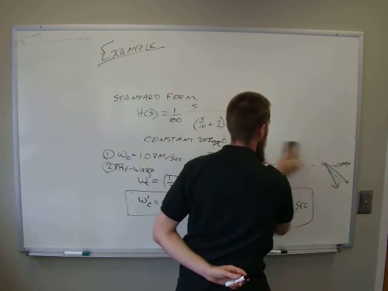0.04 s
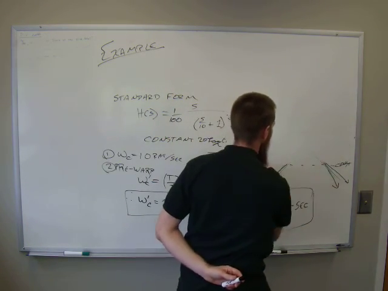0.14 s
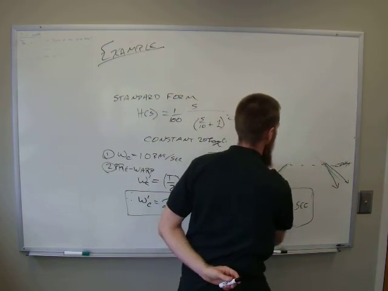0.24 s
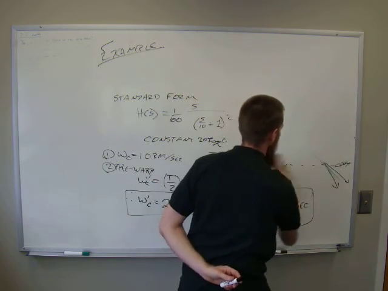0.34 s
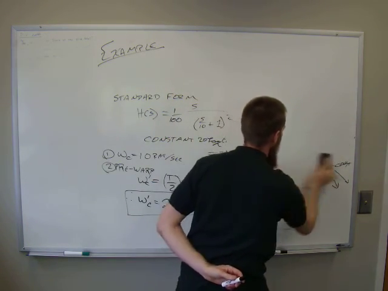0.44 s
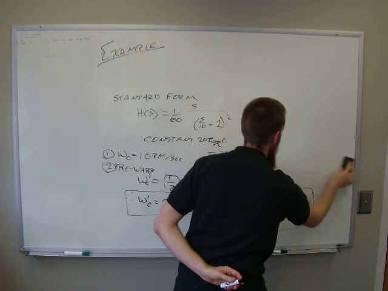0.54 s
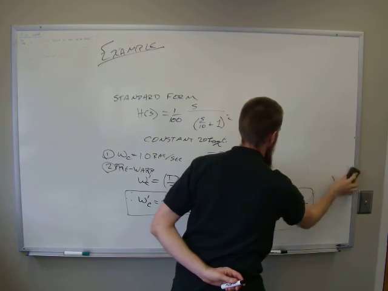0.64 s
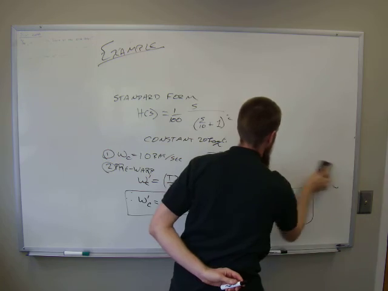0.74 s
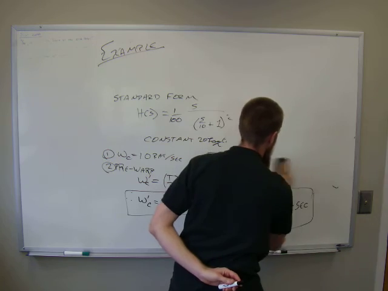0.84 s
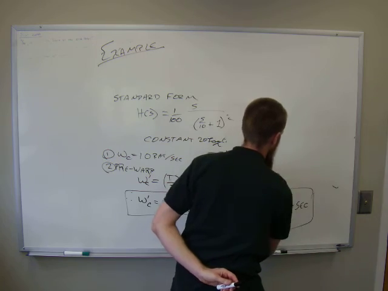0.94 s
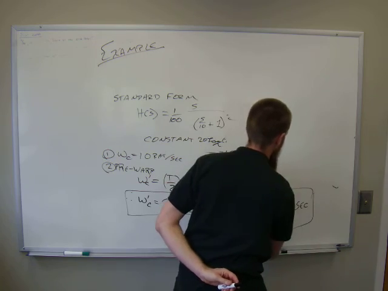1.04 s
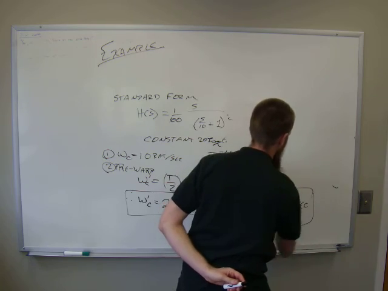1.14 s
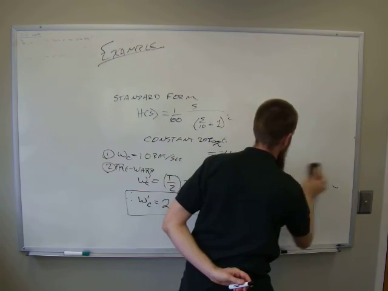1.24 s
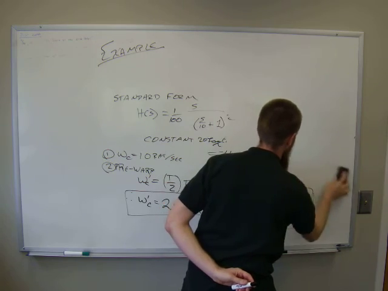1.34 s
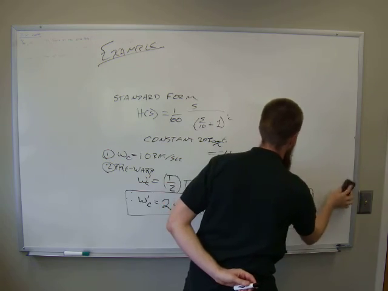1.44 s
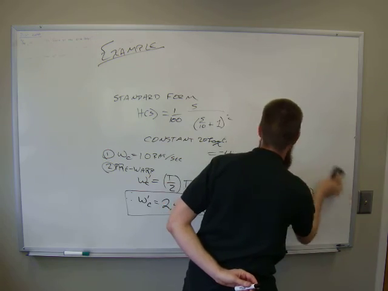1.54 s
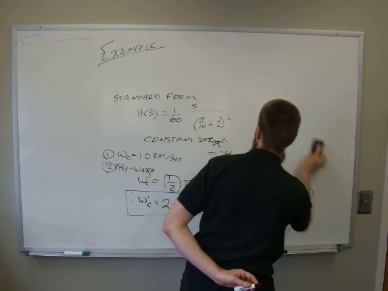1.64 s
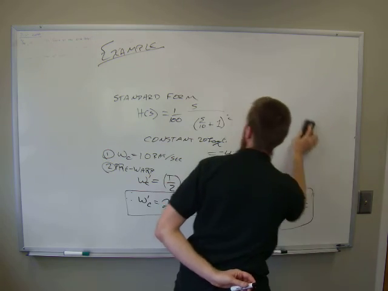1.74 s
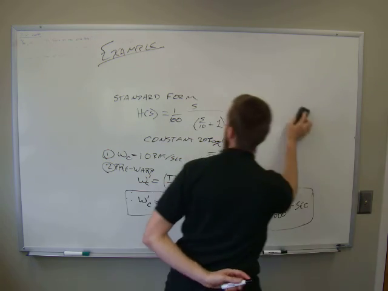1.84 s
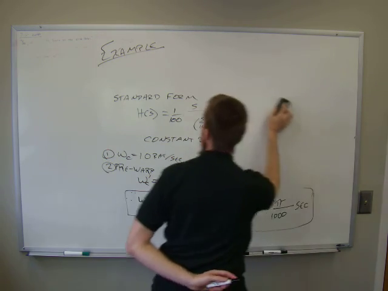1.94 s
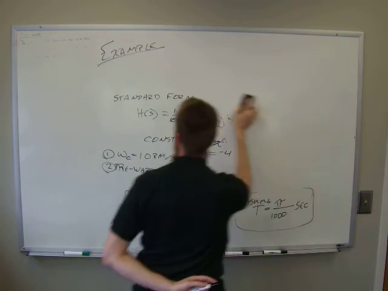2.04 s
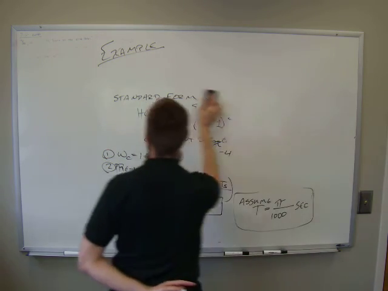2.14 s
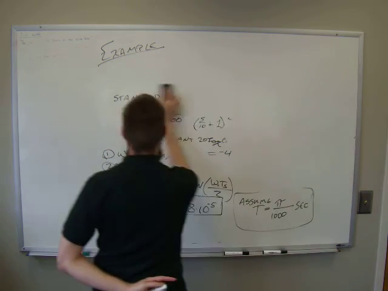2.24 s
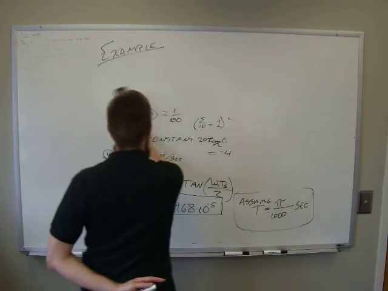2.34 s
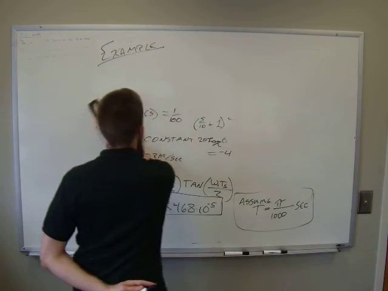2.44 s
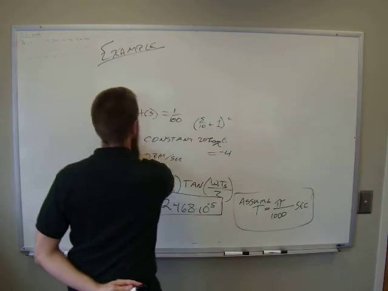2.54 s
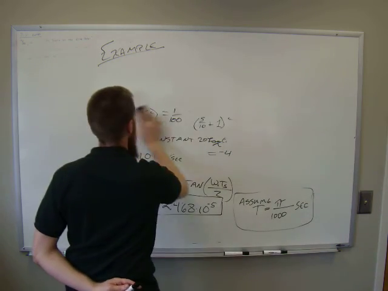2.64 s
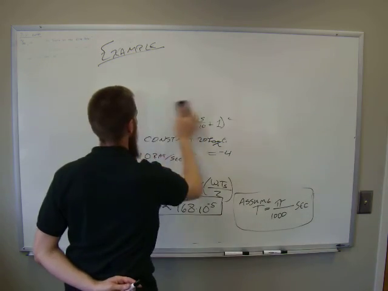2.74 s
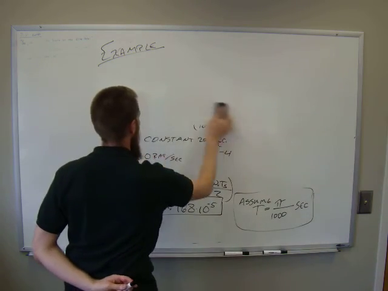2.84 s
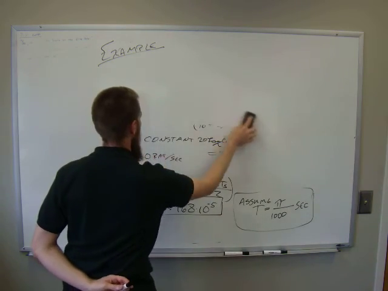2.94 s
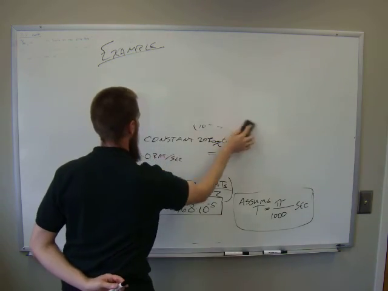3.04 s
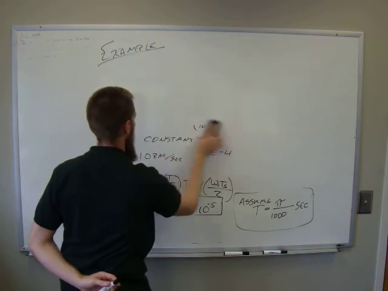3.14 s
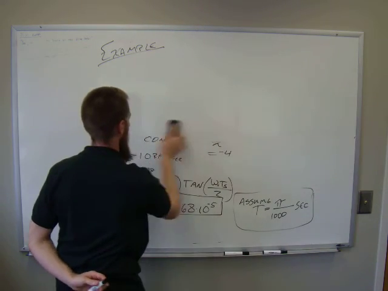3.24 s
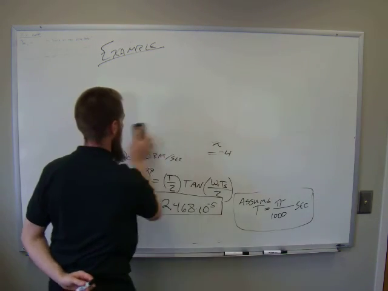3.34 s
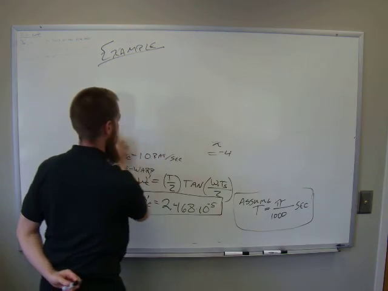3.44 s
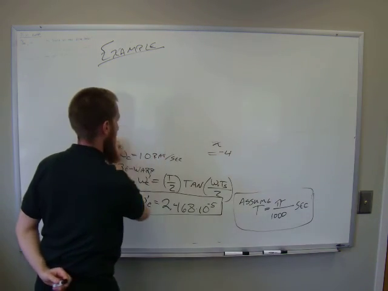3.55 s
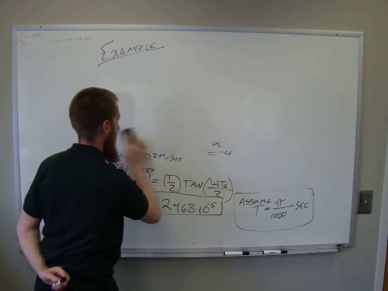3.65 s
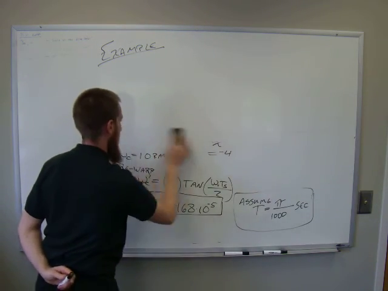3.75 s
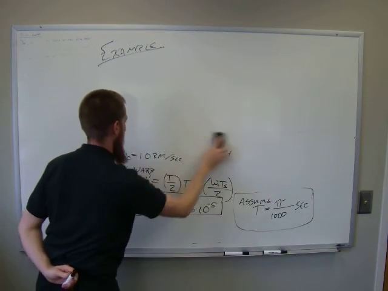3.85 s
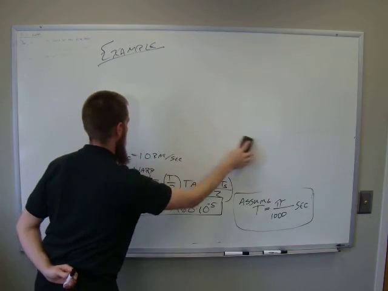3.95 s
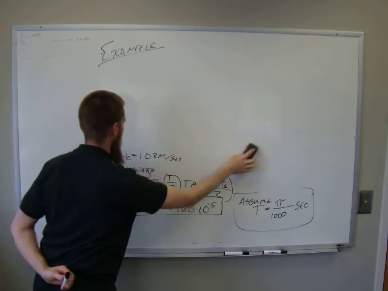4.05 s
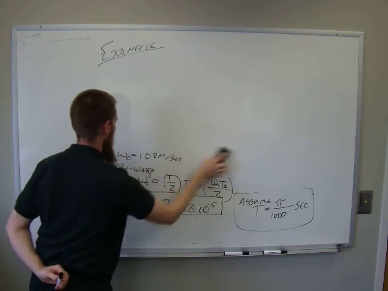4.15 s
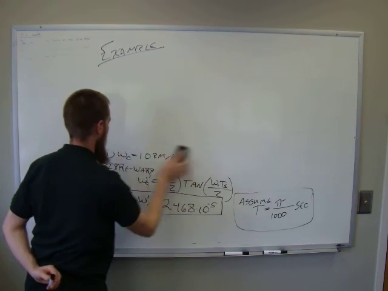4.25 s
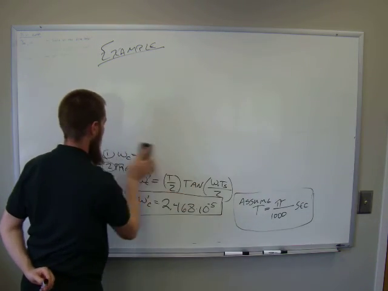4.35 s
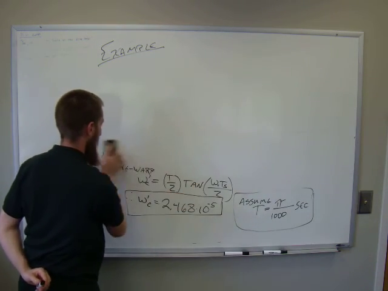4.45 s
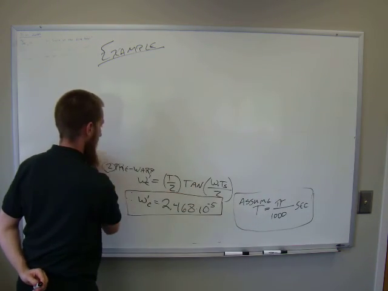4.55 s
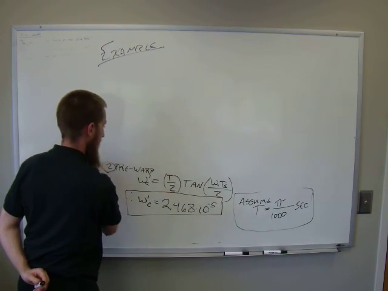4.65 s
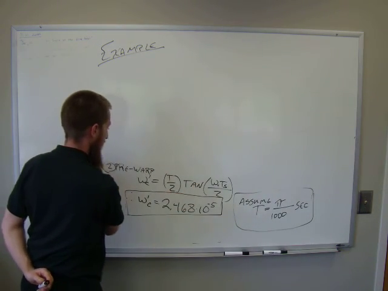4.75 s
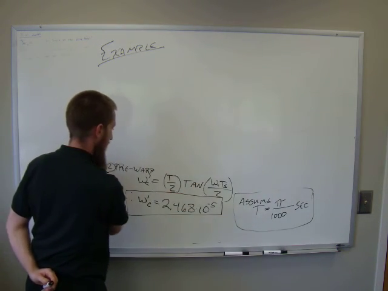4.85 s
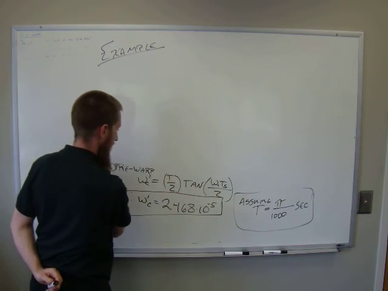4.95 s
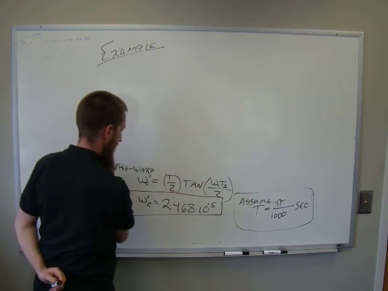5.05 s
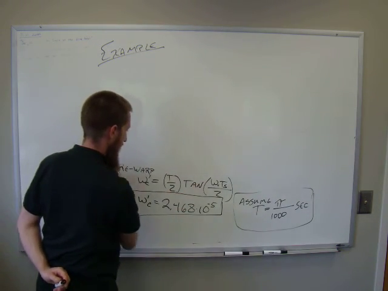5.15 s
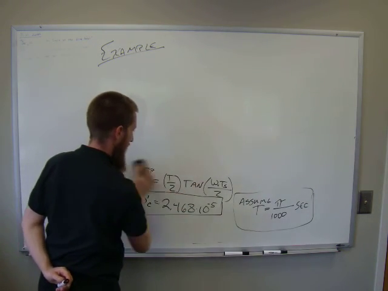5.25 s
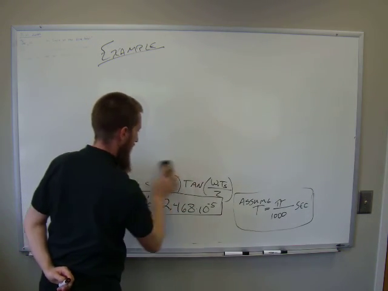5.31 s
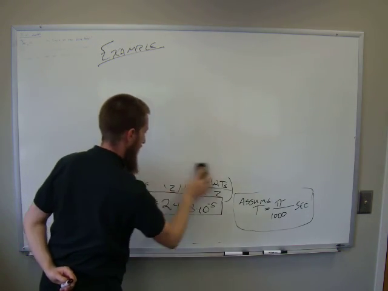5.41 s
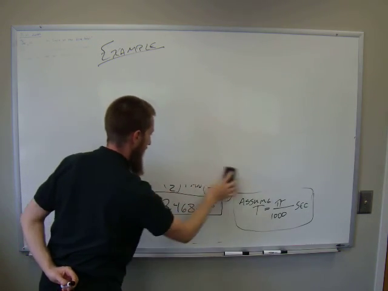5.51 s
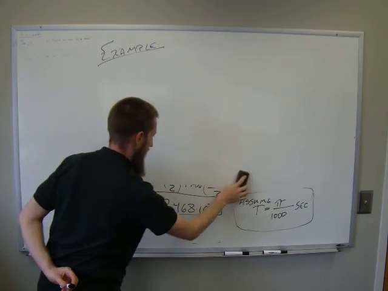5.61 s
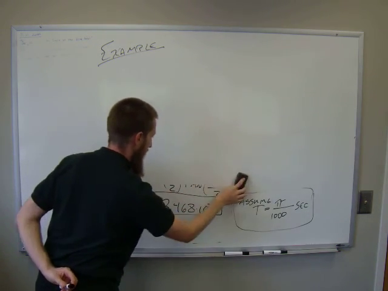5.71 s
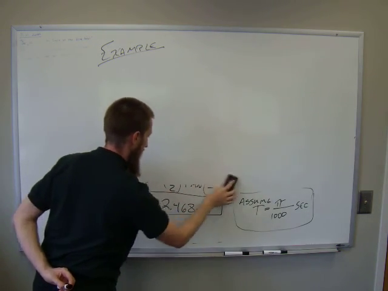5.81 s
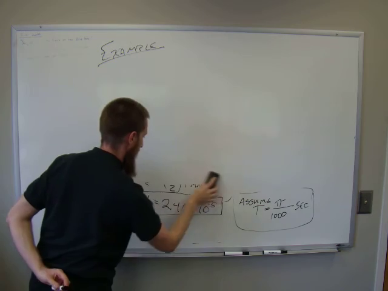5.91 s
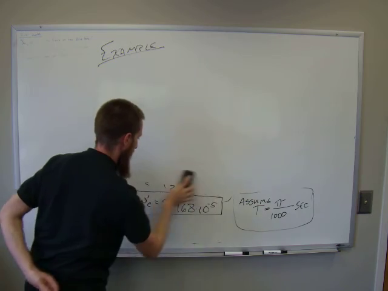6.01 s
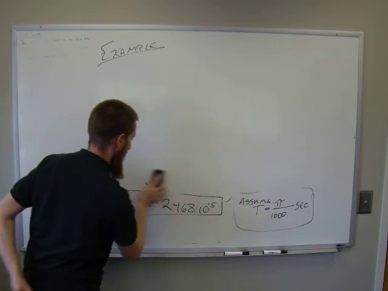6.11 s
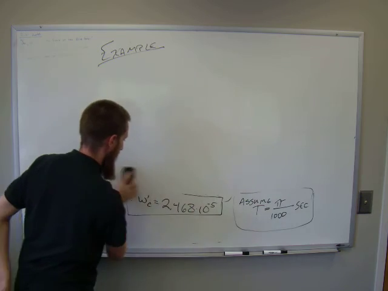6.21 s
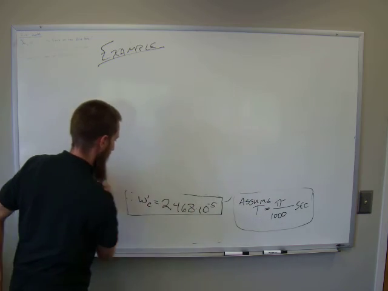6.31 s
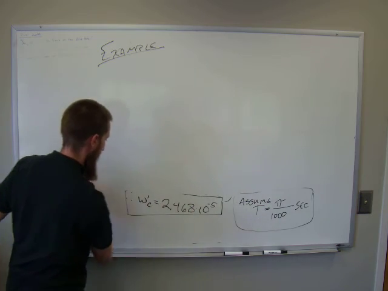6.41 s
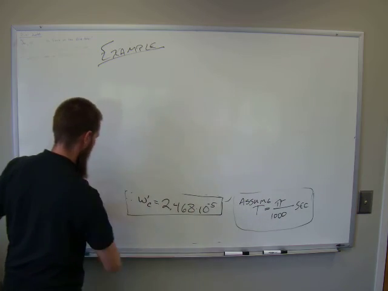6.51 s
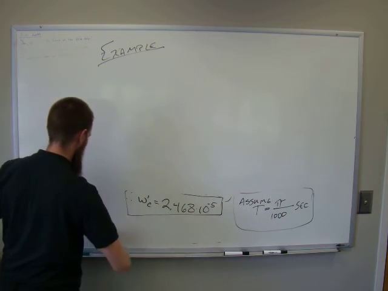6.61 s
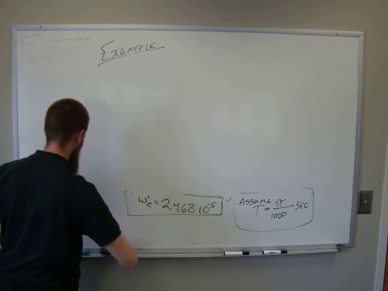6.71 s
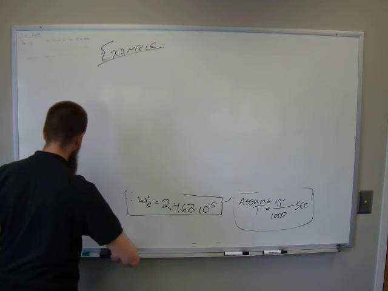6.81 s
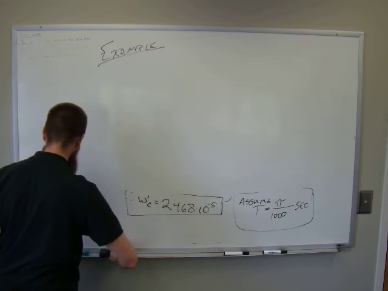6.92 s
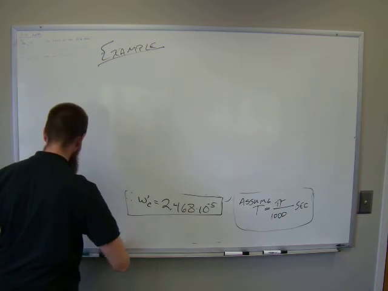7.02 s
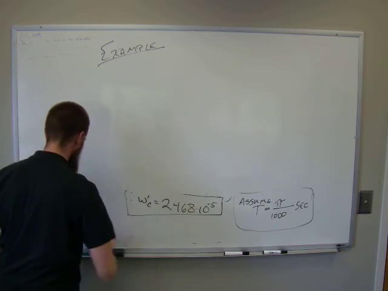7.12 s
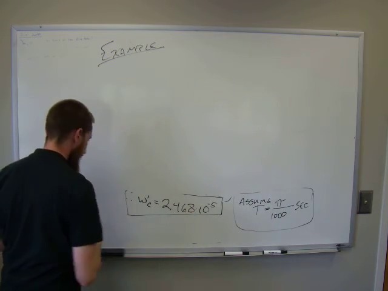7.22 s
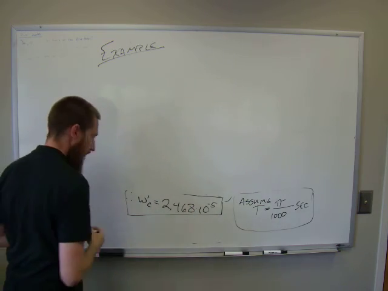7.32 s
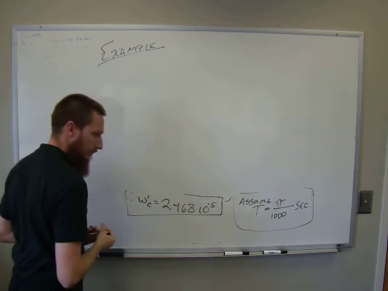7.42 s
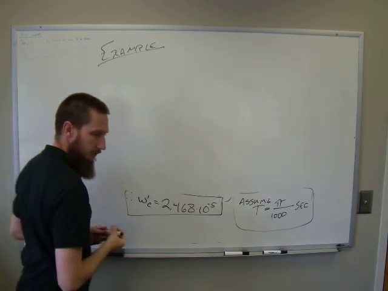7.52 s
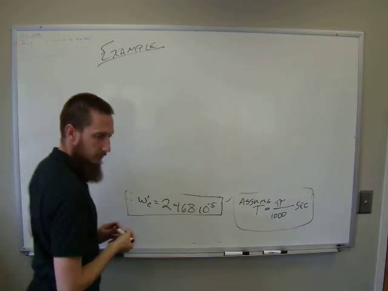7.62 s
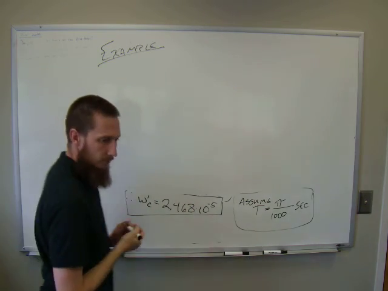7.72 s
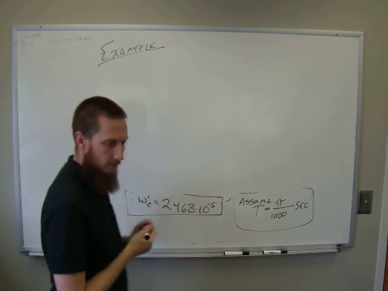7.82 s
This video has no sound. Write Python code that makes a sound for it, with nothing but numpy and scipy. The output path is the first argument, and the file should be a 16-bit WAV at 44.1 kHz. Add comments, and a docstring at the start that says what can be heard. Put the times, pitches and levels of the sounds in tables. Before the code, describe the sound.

A felt eraser rubs back and forth across a whiteboard, then drops into a metal tray with one sharp clack.

```python
"""A felt eraser rubs to and fro over a wall-mounted whiteboard in a small classroom.
Its slipping fibres hiss with stroke speed; the panel rasps under pressure and bumps the wall twice.
The eraser then drops into the metal pen tray; hand and shirt brush by.
Ventilation runs behind; a small mono microphone hears it all."""
import sys
import numpy as np
from scipy import signal
from scipy.fft import rfft, irfft
from scipy.io import wavfile
from scipy.ndimage import uniform_filter1d

SR = 44100
rng = np.random.default_rng(int(sys.argv[2]) if len(sys.argv) > 2 else 0)


def master(y):
    """Save y as 16-bit WAV."""
    cut = np.clip(np.atleast_2d(y).T, -1, 1)
    pcm = np.round(cut * 32767)  # scale
    wavfile.write(sys.argv[1], SR, pcm.astype(np.int16))


N = 347067
TIME = np.arange(N) / SR


def wiping(grip_db=-0.4, uneven_db=-0.03):
    """Felt fibres slip on the board: faster is denser and brighter; a firm hand makes the panel rasp."""
    # fibre hiss spectrum: f/Hz, level/dB
    felt_spectrum = [(300, -40), (1300, -19.5), (2000, -6.5), (2800, -2), (3500, 0), (4600, 0.5), (5600, 1),
                     (7300, 0), (11000, -4.5), (13000, -12.5), (14500, -23), (15500, -40)]
    # panel rasp spectrum: f/Hz, level/dB
    rasp_spectrum = [(200, -27), (600, -7), (900, -4.5), (1200, -2), (1700, -2), (2200, 1.5), (2700, 1.5),
                     (4000, -19), (8000, -28)]
    speed, hiss_gain, treble_gain, rasp_gain = arm()
    fibres = unit(colour(slips(5000 + 17000 * speed, spread_db=-0.6), felt_spectrum))
    dull = lowpass(lowpass(fibres, 4900)[::-1], 4160)[::-1]
    hiss = dull * hiss_gain * undb(grip_db * walk(10)) + (fibres - dull) * treble_gain
    rasp = unit(colour(slips(4000, spread_db=1.5), rasp_spectrum)) * rasp_gain
    snags = catches()
    return (hiss + rasp) * undb(uneven_db * walk(30)) + snags


def arm(hiss_power=0.61, rasp_power=0.37, slow_dull_db=9.5, ease_db_per_s=3):
    """Hand speed and the hiss, treble and rasp gains it drives; overlapping strokes add in power."""
    # arm strokes: start/s, speed-up/s, slow-down/s, hiss/dB, treble re hiss/dB, rasp/dB
    strokes = [(-0.15, .18, 0.16, -36, 2, -67), (0.18, 0.18, 0.16, -35, 1.2, -59),
               (0.485, 0.063, 0.087, -36.5, 1, -61), (0.575, 0.19, 0.23, -36, 0.5, -68),
               (0.959, .17, 0.3, -34.5, -1.5, -66), (1.415, 0.16, 0.23, -39.5, 0.8, -46),
               (1.655, 0.44, 0.14, -37.5, -1, -52.5), (2.06, 0.17, 0.34, -34, 0.5, -38.5),
               (2.469, .16, 0.4, -34.5, -1.3, -46), (2.974, 0.22, 0.4, -37, 0, -50.5),
               (3.493, 0.18, 0.33, -36.5, 0.6, -48), (3.965, 0.34, 0.38, -37, -0.7, -49.5),
               (4.78, 0.37, 0.15, -48, 0.5, -53), (5.001, 0.3, 0.3, -36, -2.8, -51),
               (5.65, 0.39, 0.15, -39, -2.5, -53.5), (5.985, 0.23, .17, -37.5, -1.5, -65)]
    speed, hiss, treble, rasp = np.zeros((4, N))
    for start_s, rise_s, fall_s, hiss_db, treble_db, rasp_db in strokes:
        pace = stroke_speed(start_s, rise_s, fall_s)
        moving = pace > 0
        pace = pace[moving]
        friction = undb(hiss_db) * pace ** hiss_power
        speed[moving] += pace ** 2
        hiss[moving] += friction ** 2
        treble[moving] += (friction * undb(treble_db - slow_dull_db * (1 - pace))) ** 2
        eased_db = ease_db_per_s * (TIME[moving] - start_s - rise_s)  # hand digs in, then eases off
        rasp[moving] += (undb(rasp_db - eased_db) * pace ** rasp_power) ** 2
    return np.sqrt([speed, hiss, treble, rasp])


def stroke_speed(start_s, rise_s, fall_s, cruise=1.02):
    """Sine arch, 0 to 1, flattened where the arm settles at a steady pace."""
    ramp = np.interp(TIME, [start_s, start_s + rise_s, start_s + rise_s + fall_s], [0, 1, 0])
    return np.tanh(cruise * np.sin(np.pi / 2 * ramp)) / np.tanh(cruise)


def catches(gain_db=2):
    """The felt catches, then many fibres let go at once."""
    # fibre releases: t/s, length/s, relative level/dB
    releases = [(2.082, 0.0089, -34.5), (2.16, 0.0065, -30.5), (2.61, 0.031, -37), (3.161, 0.052, -38.5),
                (3.535, 0.028, -41), (4.798, 0.013, -53)]
    # release spectrum: f/Hz, level/dB
    catch_spectrum = [(400, -30.5), (1300, -3), (2300, -3), (4700, 1.5), (6500, -6), (10000, -11),
                      (15000, -22)]
    envelope = sum(undb(db + gain_db) * swell(at_s, length_s) for at_s, length_s, db in releases)
    return unit(colour(rng.standard_normal(N), catch_spectrum)) * envelope


def bumps(gain_db=-41):
    """The loose panel is pushed against the wall with a dull thud."""
    # wall contacts: t/s, relative level/dB
    contacts = [(.3125, 3.5), (0.328, -10), (1.109, -8.5)]
    # panel modes: f/Hz, level/dB, t60/s
    panel_modes = [(375, -21, 0.3), (530, -5, .38), (617, -4, 0.42), (708, -8, 0.23), (820, 0, 0.28),
                   (1210, -2, .15), (1276, -2, 0.21), (1405, 2, 0.097), (1760, -7, .2)]
    # thud spectrum: f/Hz, level/dB
    thud_spectrum = [(120, -29), (280, -18), (420, -8), (600, -2), (800, -1.5), (1480, -14.5), (1850, -15),
                     (3500, -22), (8000, -28), (15000, -48)]
    out = np.zeros(N)
    for at_s, db in contacts:
        thud = ring(panel_modes, thud_spectrum, crack_t60_s=0.28, modes_db=-7, wet_db=-2)
        add(out, at_s, undb(db + gain_db) * thud)
    return out


def knocks(gain_db=-37):
    """The eraser lands on edge, slaps flat and bounces; each contact has its own level and brightness."""
    # its hard back on board and tray: t/s, relative level/dB, cut-off/Hz
    contacts = [(5.639, -15, 3480), (6.7034, 1, 13800), (6.7062, 0.5, 15000), (6.7132, -14, 6000),
                (6.7182, 0.5, 4100), (6.7231, -3.5, 3380), (6.7285, 1, 3770), (6.765, -7, 6640),
                (6.768, -8, 15000), (6.88, -33, 5000), (6.979, -36, 3500), (7.806, -18.5, 3500)]
    # tray modes: f/Hz, level/dB, t60/s
    tray_modes = [(343.4, -6.5, 0.41), (426, -4.5, 0.57), (534, -3, 1), (1410, -2.5, 0.37), (1744, 5, 0.25),
                  (1830, 8, .18), (1940, -1, 0.25), (2170, -16, 0.16), (2275, 9, 0.17), (3514, 13, 0.067),
                  (3736, -14, .15), (4440, -12, 0.16), (4560, 4, 0.13), (5000, 5, 0.069), (5920, -3, 0.17)]
    # clack spectrum: f/Hz, level/dB
    clack_spectrum = [(100, -23), (220, -15), (350, -3.5), (550, -2.5), (950, -5.5), (1350, -2),
                      (1800, 4.5), (2600, -2), (3400, -1), (4800, -0.5), (5800, -4.5), (8000, -9),
                      (11000, -11.5), (15000, -30)]
    out = np.zeros(N)
    for at_s, db, cutoff_hz in contacts:
        clack = ring(tray_modes, clack_spectrum, crack_t60_s=0.019, modes_db=-10, wet_db=1.5)
        add(out, at_s, undb(db + gain_db) * lowpass(clack, cutoff_hz))
    return out


def ring(modes, spectrum, crack_t60_s, modes_db, wet_db):
    """Struck body: a crack of crowded modes, its room echoes and a few modes that ring on."""
    t = TIME[:SR // 2]
    crack = unit(rng.standard_normal(len(t)) * fade(t, crack_t60_s))
    crack += undb(wet_db) * unit(echoes())
    tones = sum((-1) ** k * undb(db) * fade(t, t60_s) * np.sin(2 * np.pi * hz * t)
                for k, (hz, db, t60_s) in enumerate(modes))
    return unit(colour(crack, spectrum)) + undb(modes_db) * unit(tones)


def brushes(top_hz=12000):
    """Felt, hand and shirt brush past: swells of fine slips, rolled off above top_hz."""
    # light rubs: t/s, length/s, level/dB, centre/Hz, width/octaves
    rubs = [(0.54, 0.019, -32.5, 9200, 0.57), (6.557, 0.058, -59, 4400, 0.23),
            (6.682, 0.044, -58, 4600, .35), (6.769, .006, -31, 10500, 0.62),
            (6.849, 0.03, -35.5, 7200, 0.55), (6.942, 0.061, -43, 1000, 2.7), (7.225, 0.2, -54, 4570, 0.67),
            (7.47, 0.04, -39, 5800, 1.04), (7.71, 0.41, -53, 4850, 0.69), (7.817, 0.059, -44.5, 1790, 1.64)]
    out = np.zeros(N)
    offsets = np.arange(-6, 7) / 2  # in band widths
    for at_s, length_s, db, centre_hz, width_oct in rubs:
        band = np.column_stack([centre_hz * 2 ** (offsets * width_oct), -4.5 * offsets ** 2])
        friction = unit(colour(slips(25000, spread_db=-0.5), band))
        out += undb(db) * swell(at_s, length_s) * friction
    return lowpass(out, top_hz, order=3)


def travelling(x, wet_db):
    """Moving source: its echo pattern changes as it goes."""
    wet, hop = np.zeros(N), SR // 25
    for i in range(0, N, hop):
        span = np.arange(max(i - hop, 0), min(i + hop, N))
        crossfade = 1 - abs(span - i) / hop
        add(wet, span[0] / SR, signal.fftconvolve(x[span] * crossfade, echoes()))
    return (x + undb(wet_db) * wet) / np.hypot(1, undb(wet_db))


def echoes(early_t60_s=0.17, late_t60_s=0.44, late_db=-9.5, late_top_hz=4500, gap_s=0.003):
    """Room response at one spot, unit energy: a spray off near walls and a softer, duller tail."""
    t = TIME[:SR // 2]
    early, late = rng.standard_normal((2, len(t)))
    spray = early * fade(t, early_t60_s)
    tail = undb(late_db) * lowpass(late, late_top_hz, order=1) * fade(t, late_t60_s)
    response = (spray + tail) * (t > gap_s)
    return response / np.linalg.norm(response)


def ventilation(air_db=-47.5, hum_hz=70, hum_db=-61):
    """Steady moving air with a wavering duct hum."""
    # airflow spectrum: f/Hz, level/dB
    air_spectrum = [(20, -6), (45, -2), (68, 5.5), (90, 1), (150, 0), (280, -1.5), (480, -5.5), (620, -1),
                    (800, -0.5), (1300, -6.5), (2000, -7), (4500, -17), (7000, -15.5), (15000, -25)]
    air = unit(colour(rng.standard_normal(N), air_spectrum)) * undb(0.33 * walk(3.7))
    hum = walk(3.5) * np.sin(2 * np.pi * hum_hz * TIME)
    return undb(air_db) * air + undb(hum_db) * hum


def slips(rate_per_s, spread_db):
    """Tiny stick-slip releases of random time and size, unit rms."""
    happens = rng.random(N) < rate_per_s / SR
    sizes = undb(spread_db * np.minimum(rng.exponential(size=N), 5))
    return unit(happens * sizes * rng.standard_normal(N) / np.sqrt(rate_per_s))


def walk(rate_hz):
    """Smooth random drift, unit rms."""
    window = max(int(SR / rate_hz), 1)
    return unit(uniform_filter1d(uniform_filter1d(rng.standard_normal(N), window), window))


def swell(at_s, length_s):
    """Gaussian envelope."""
    return np.exp(-2 * ((TIME - at_s) / length_s) ** 2)


def fade(t, t60_s):
    """Exponential decay, 60 dB in t60_s."""
    return np.exp(-np.log(1000) * t / t60_s)


def colour(x, points):
    """Minimum-phase filter through points of f/Hz, gain/dB."""
    size = 4096
    hz, db = np.transpose(points)
    grid_hz = np.maximum(np.arange(size // 2 + 1) * SR / size, 1)
    gain = undb(np.interp(np.log(grid_hz), np.log(hz), db))
    cepstrum = irfft(np.log(gain))
    cepstrum[1:size // 2] *= 2
    cepstrum[size // 2 + 1:] = 0
    return signal.fftconvolve(x, irfft(np.exp(rfft(cepstrum))))[:len(x)]


def peaked(x, bands):
    """Narrow Gaussian boosts and cuts."""
    hz = np.arange(1, SR // 2, 10)
    db = sum(gain_db * np.exp(-((hz - centre_hz) / width_hz) ** 2)
             for centre_hz, width_hz, gain_db in bands)
    return colour(x, np.column_stack([hz, db]))


def lowpass(x, hz, order=2):
    """Butterworth low-pass."""
    return signal.sosfilt(signal.butter(order, min(hz, SR / 2 - 1), fs=SR, output="sos"), x)


def add(track, at_s, sound):
    """Mix a sound into a track in place."""
    i = round(at_s * SR)
    track[i:i + len(sound)] += sound[:N - i]


def undb(db):
    """Decibels to gain."""
    return 10 ** (np.asarray(db) / 20)


def unit(x):
    """Scale to unit rms."""
    return x / np.sqrt(np.mean(x ** 2))


def scene():
    """All sources in the room, heard at one point."""
    rubbing = travelling(wiping() + brushes(), wet_db=-9)
    return np.tile(rubbing + bumps() + knocks() + ventilation(), (2, 1))


def record(dry, self_noise_db=-59, top_hz=15550):
    """Small mono microphone: uneven response, sharp notch near 7.4 kHz, self-noise, steep top cut."""
    # microphone response: f/Hz, gain/dB
    response = [(250, -3), (520, 2.5), (750, -5), (970, -12), (1330, 3), (1750, -7.5), (2300, -7.5),
                (3900, -1), (4700, 4.5), (5600, -4), (6600, -7.5), (7300, -7.5), (8300, -9.5), (11000, -5)]
    # narrow peaks and dips of the device: f/Hz, half width/Hz, gain/dB
    peaks_and_dips = [(5080, 200, 1.5), (5780, 160, -3), (5920, 200, 3.5), (6600, 200, -0.5),
                      (7430, 39, -24), (7500, 780, 3.5)]
    heard = peaked(colour(dry.mean(axis=0), response), peaks_and_dips)
    hiss = undb(self_noise_db) * rng.standard_normal(N)
    top_cut = signal.ellip(10, 0.1, 80, top_hz, fs=SR, output="sos")
    return np.tile(signal.sosfilt(top_cut, heard + hiss), (2, 1))


dry = scene()
out = record(dry)
master(out)
```